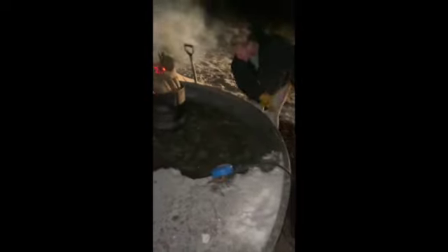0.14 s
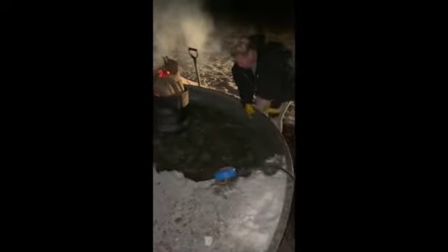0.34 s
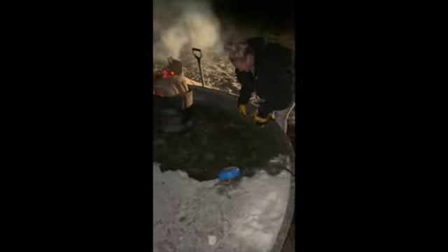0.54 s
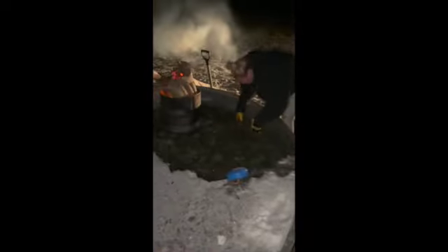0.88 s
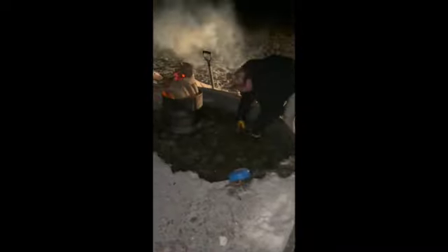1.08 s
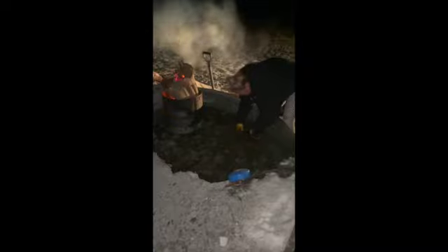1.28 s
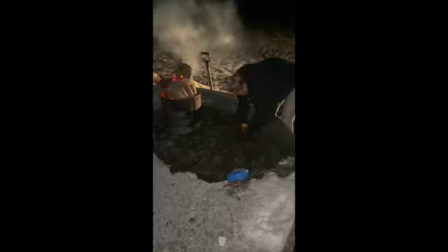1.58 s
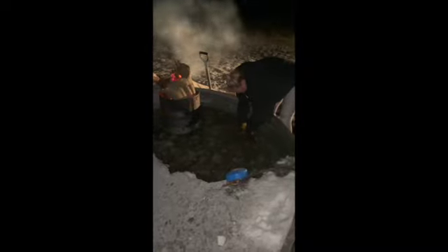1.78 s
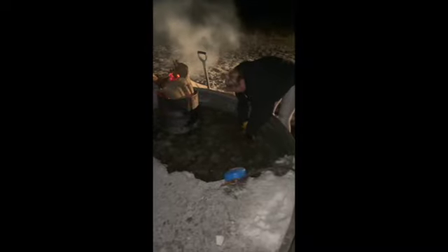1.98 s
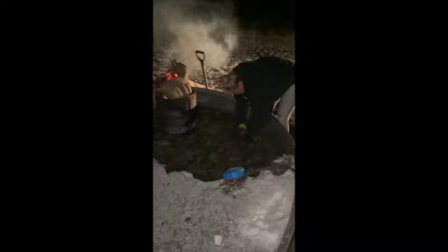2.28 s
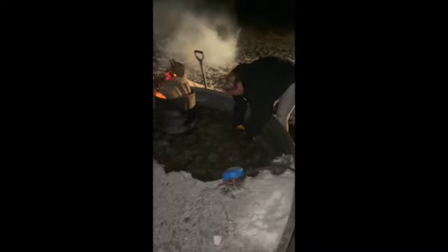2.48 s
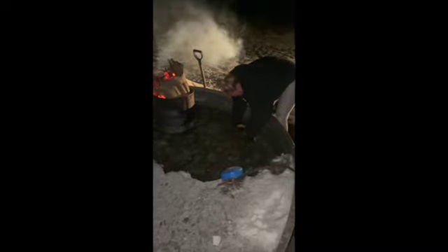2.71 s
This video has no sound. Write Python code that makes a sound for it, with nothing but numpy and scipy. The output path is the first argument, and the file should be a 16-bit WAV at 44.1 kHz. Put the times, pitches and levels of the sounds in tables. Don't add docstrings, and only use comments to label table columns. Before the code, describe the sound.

Ice being broken and moved in an outdoor water tank. Faint shard ticks and tiny glove squeaks near 0.2 s; at 0.3-0.58 s a fast brittle run of snaps, with a loud knock on the rim at 0.35 and crunching crumbs. Sparse ticks until 1.2, then hollow slabs bump and grind, busiest around 1.4-1.6, with sharp clacks near 1.95. Water laps and thumps, droplets chirp, low fire rumble throughout.

```python
import sys
import numpy as np
from scipy import signal
from scipy.fft import rfft, irfft, next_fast_len
from scipy.io import wavfile
from scipy.ndimage import uniform_filter1d

SR = 44100
rng = np.random.default_rng(int(sys.argv[2]) if len(sys.argv) > 2 else 0)


def persist_wave(psi):
    counts = np.round(np.clip(psi, -1, 1) * 32767).astype(np.int16)
    wavfile.write(sys.argv[1], SR, np.atleast_2d(counts).T)


def undo_db(level):
    steps = np.asarray(level, float) / 20
    return 10 ** steps


N = 125685

# t/s, peak level/dB, ring f/Hz, brightness/dB, length/ms
SNAPS = [(0.2952, -11, 1220, -5, 5.5), (0.3134, -14, 6900, 4, 1.4), (0.3002, -23, 3100, -13, 5.4),
         (0.3284, -13.5, 2520, -6.5, 8.2), (0.3334, -11.5, 5820, -11, 2.7), (0.368, -20.5, 2460, -7, 4.5),
         (0.3758, -35, 920, 11, 3.2), (0.3907, -13.5, 7100, 15, 1.2), (0.4044, -12.5, 1700, -5.5, 4.2),
         (0.4251, -16, 6650, 31, 1.7), (0.4482, -21.5, 2920, -13, 6.6), (0.4609, -23.5, 2730, -10, 5.9),
         (0.4808, -25.5, 6750, 6, 5.1), (0.5, -27, 1780, 2, 4.6), (0.5239, -14, 1010, -4, 2.8),
         (0.5763, -29.5, 1000, -18.5, 6.3)]
# t/s, peak level/dB, brightness/dB
TICKS = [(0.042, -45, 15), (0.063, -36, 20), (0.538, -54, 10), (0.572, -43, 10), (0.634, -34, -1),
         (0.653, -34, -9), (0.673, -33.5, -11), (0.742, -39, -2), (0.87, -34.5, -12), (0.8965, -38, 4),
         (0.93, -41.5, 1), (1.0918, -32.5, 13.5), (1.1097, -32, -24), (1.248, -32.5, -8), (1.3454, -34, 6),
         (1.369, -36, -1), (1.459, -37, 4), (1.4356, -26.5, -16.5), (1.474, -32.5, -22),
         (1.5032, -24.5, -18), (1.5258, -22, -14.5), (1.5544, -26, -11), (1.6739, -33.5, -16.5),
         (1.96, -40, 8), (1.998, -54, 4), (2.153, -41, 7), (2.2064, -48, 10), (2.2463, -42.5, 9),
         (2.319, -33.5, -15), (2.45, -33, -17.5), (2.7496, -35, 24)]
# t/s, peak level/dB, ring f/Hz
CHIPS = [(0.0295, -43.5, 3170), (0.854, -43.5, 2680), (1.151, -40, 2220), (1.2151, -36, 1260),
         (1.2357, -35.5, 1960), (1.3212, -40, 2610), (1.5926, -33, 2000), (1.8597, -40.5, 2230),
         (1.916, -39.5, 2980), (1.9994, -40, 1330), (2.0303, -32, 1420), (2.162, -39.5, 2790),
         (2.2802, -43, 1900), (2.377, -39, 1470), (2.5473, -37.5, 2440), (2.5794, -39, 3050),
         (2.6124, -40.5, 4020), (2.6472, -41.5, 3440), (2.6746, -40, 3320), (2.7033, -40.5, 2120),
         (2.8396, -38.5, 3010)]
# t/s, peak level/dB, ring f/Hz
CLACKS = [(0.2974, -25, 456), (0.844, -39, 614), (1.046, -32.5, 1470), (1.368, -28.5, 870),
          (1.435, -24, 990), (1.503, -40, 935), (1.735, -34, 2100), (1.804, -37.5, 606),
          (1.936, -20.5, 800), (1.9602, -16, 1270), (2.047, -30.5, 1080), (2.301, -32, 740),
          (2.419, -35, 1180), (2.475, -29, 860)]
# f/Hz, level/dB
CRACK_SPECTRUM = [(500, -2.5), (1200, 4.5), (3000, 8.5), (5000, 5), (6500, 10.5), (10000, 0), (13000, 8),
                  (16000, -8)]
# t/s, level/dB
CRUNCH_LEVEL = [(.29, -80), (.3, -48), (.36, -41), (.385, -56), (.41, -40.5), (.47, -45.5), (.52, -46.5),
                (.56, -57), (1.3, -70.5), (1.53, -49), (1.6, -56), (1.8, -80), (1.96, -69), (2.2, -58)]
# t/s, peak level/dB, share of the lower main mode/0-1
BUMPS = [(1.242, -32, 0.15), (1.373, -22.5, 0), (1.444, -19.5, 0.63), (1.469, -24.5, 0.93),
         (1.533, -26, 0.14), (1.512, -44, .2), (1.561, -17.5, 1), (1.59, -28, .3), (1.609, -30, 0.15),
         (1.815, -25, 0.3), (1.965, -35, 1), (2.051, -26, 0.58), (2.091, -35.5, 0.2), (2.31, -32, 0.34),
         (2.501, -23, 0.52), (2.526, -24, 0.4), (2.559, -29, 0.8), (2.716, -31, 0.32)]
# f/Hz, level/dB, t60/s
SLAB_MODES = [
    (216, -2.5, .05),
    (305.5, -2.5, 0.11),
    (342.9, 0, 0.094),
    (603, -9.5, 0.071),
    (780, -9, 0.046),
    (959, -7, 0.051),
    (1238, -10.5, 0.037),
    (1420, -26, 0.021),
]
# t/s, level/dB
STIR_LEVEL = [(0, -53.5), (.13, -52), (.26, -55.5), (.36, -48), (.6, -55), (.69, -48.5), (.78, -62.5),
              (1.0, -52.5), (1.3, -47.5), (1.53, -38), (1.68, -41), (1.78, -49), (1.97, -38.5),
              (2.08, -43.5), (2.2, -51.5), (2.5, -44), (2.68, -48.5), (2.85, -52)]
SQUEAK_TIMES = [
    .192,
    .222,
    .238,
    .256,
]
# f/Hz, level/dB
LAP_SPECTRUM = [(300, -9), (600, 7.5), (1000, -17.5), (2000, -11), (4000, -18.5), (8000, -23.5),
                (12000, -22), (16000, -22.5)]
# t/s, peak level/dB, f/Hz
THUMPS = [(0.013, -35.5, 155), (0.202, -30.5, 112), (0.339, -27, 107.3), (.48, -27.5, 59.3),
          (0.546, -20, 69), (0.574, -25, 85), (0.65, -28.5, 83), (1.072, -23, 103), (1.25, -26, 124),
          (1.605, -22.5, 146), (1.799, -30, 58), (1.919, -25, 79), (1.988, -25.5, 90), (2.522, -27, 150)]
# t/s, level/dB
SURGE_LEVEL = [(0, -45), (.22, -42), (.3, -40.5), (.56, -40), (.66, -42.5), (1.0, -40), (1.1, -41.5),
               (1.3, -40.5), (1.45, -41), (1.6, -38.5), (1.73, -39.5), (1.93, -38), (2.06, -37.5),
               (2.2, -42.5), (2.55, -39), (2.85, -42)]
# f/Hz, level/dB
RUMBLE_SPECTRUM = [(25, -79), (43, -3), (97, -4.5), (124, 1.5), (183, -7.5), (248, -8.5), (500, -35),
                   (1100, -120)]
# f/Hz, level/dB
AIR_SPECTRUM = [(400, -21), (750, -14), (1050, 13), (3000, -5), (6000, -1.5), (10000, 8.5), (13000, -6),
                (16000, -27)]
# f/Hz, correlation/1
LIKENESS = [(60, .999), (150, .98), (400, .88), (1000, .75), (4000, .8), (7000, .99), (9000, .999),
            (14000, .93)]
# f/Hz, phase/rad
PORT_PHASE = [(150, 0), (900, -.6), (2600, .7), (4300, .1), (7000, 1), (8550, 3.14), (11600, 3.14),
              (14000, 6.2)]
MATCHED_BAND_HZ = [8400, 11800]

SNAP_RING_DB, SNAP_RING_CYCLES, SNAP_PIVOT_HZ = -3, 16, 2600
TICK_MS, CHIP_MS, CLACK_MS, CLACK_DULL_HZ = 3.22, 4.6, 8.1, 1590
TOCK_S, TOCK_DB, TOCK_HZ, TOCK_RISE_MS, TOCK_T60_S = .3535, -4, 746, 4.55, 0.01
CRUNCH_PER_S, GRIND_PER_S, DROPS_PER_S = 4000, 700, 800
GRIND_DB, DROPS_DB, BUMP_RISE_MS = 5.5, -7, 6.1
SQUEAK_HZ, SQUEAK_T60_S = 1846, 0.021
LAP_DB, LAP_DULL_HZ, LAP_SWELL = -0.5, 850, 0.55
THUMP_CYCLES, THUMP_RISE_MS = 10, 19.4
RUMBLE_DB, AIR_DB = 1, -60
ECHO_DB, ECHO_T60_S, SCATTER_DB, GLINT_DB = -11, .075, -8, -6.5
PAN_DB, CUTOFF_HZ = -.4, 17000


def rms_one(x):
    return x / np.sqrt(np.mean(x ** 2) + 1e-20)


def in_time(rows):
    return np.interp(np.arange(N) / SR, *np.transpose(rows))


def at_hz(points, hz):
    f, value = np.array(points).T
    return np.interp(np.log(hz + 1), np.log(f), value)


def add(out, s, x):
    i = int(s * SR)
    out[i:i + len(x)] += x[:N - i]


def drift(rate_hz):
    r = np.exp(-80 * np.pi * rate_hz / SR)
    white = rng.standard_normal(N // 40 + 2002)
    slow = signal.lfilter([1], [1, -2 * r, r * r], white)[2000:]
    return np.interp(np.arange(N) / 40, np.arange(len(slow)), rms_one(slow))


def grains(per_s, spread_db):
    sizes = undo_db(spread_db * np.minimum(rng.exponential(1, N), 5)) * rng.choice([-1, 1], N)
    return sizes * (rng.random(N) < per_s / SR)


def ring(clicks, hz, t60_s):
    r = undo_db(-60 / (t60_s * SR))
    w = 2 * np.pi * hz / SR
    return signal.lfilter([0, np.sin(w)], [1, -2 * r * np.cos(w), r * r], clicks + 1e-18)


def push(clicks, hz, rise_ms):
    t = np.arange(900) / SR
    shape = np.sin(np.pi * np.minimum(t * 1000 / rise_ms, 1)) ** 2
    pulse = 2 * shape * np.cos(2 * np.pi * hz * t) / shape.sum()
    return signal.fftconvolve(clicks, pulse)[:N]


def colour(x, spectrum):
    cep = irfft(at_hz(spectrum, np.linspace(0, SR / 2, 1025)) * np.log(10) / 20)
    cep[1:1024] *= 2
    cep[1025:] = 0
    return signal.fftconvolve(x, irfft(np.exp(rfft(cep))))[:len(x)]


def banded_noise(spectrum, low_hz, count, patchy_db, rate_hz):
    out, together = 0, drift(rate_hz)
    edges = low_hz * 2 ** (np.arange(count + 1) / 2)
    white = rng.standard_normal((2, 2, N))
    for k, (low, high) in enumerate(zip(edges, np.minimum(edges[1:], 20000))):
        band = signal.butter(2, [low, high], "band", fs=SR, output="sos")
        mid, side = signal.sosfilt(band, white[k % 2])
        hz = np.sqrt(low * high)
        alike = np.clip(at_hz(LIKENESS, hz), -1, 1)
        gain = undo_db(at_hz(spectrum, hz) + patchy_db * (.6 * together + drift(rate_hz)))
        out = out + gain * (np.sqrt(1 + alike) * mid + np.sqrt(1 - alike) * side * [[1], [-1]])
    return rms_one(out)


def fracture(peak_db, hz, bright_db, ms, ring_db):
    t_ms = np.arange(2000) / SR * 1000
    noise, chips = rng.standard_normal((2, len(t_ms))), rng.random(4)
    ragged = np.exp(3.5 * uniform_filter1d(noise[1], size=40))
    burst = noise[0] * ragged * np.exp(-t_ms / (.45 * ms)) * np.minimum(t_ms / (.35 * ms), 1)
    chip_rings = sum(ring(burst, 900 * 14 ** c, .005) for c in chips)
    body = rms_one(burst) + .4 * rms_one(chip_rings)
    low = signal.lfilter(*signal.butter(2, SNAP_PIVOT_HZ * 1.3, "low", fs=SR), body)
    high = signal.lfilter(*signal.butter(2, SNAP_PIVOT_HZ * 1.6, "high", fs=SR), body)
    shard = ring(burst, hz, SNAP_RING_CYCLES / hz)
    x = rms_one(low) + undo_db(bright_db + 12.5) * rms_one(high) + undo_db(ring_db) * rms_one(shard)
    return undo_db(peak_db) * x / np.sqrt(uniform_filter1d(x ** 2, size=40).max())


def shards():
    out, dull = np.zeros((2, N))
    for s, db, hz, bright_db, ms in SNAPS:
        add(out, s, fracture(db - 9.5, hz, bright_db, ms, SNAP_RING_DB))
    for s, db, bright_db in TICKS:
        add(out, s, fracture(db - 6.5, 3350, bright_db, TICK_MS, ring_db=-14.5))
    for s, db, hz in CHIPS:
        add(out, s, fracture(db - 9, hz, -18.5, CHIP_MS, ring_db=3.5))
    for s, db, hz in CLACKS:
        add(dull, s, fracture(db - 2, hz, -13, CLACK_MS, ring_db=-5.0))
    add(out, TOCK_S, fracture(TOCK_DB - 13, 950, -9, TICK_MS, SNAP_RING_DB))
    clacks = signal.lfilter(*signal.butter(1, CLACK_DULL_HZ, fs=SR), dull)
    return colour(out + clacks, CRACK_SPECTRUM)


def tock():
    click, out = np.zeros((2, N))
    click[int(TOCK_S * SR)] = undo_db(TOCK_DB)
    for ratio, db in ((1.004, 2.5), (1.274, -1.5), (0.323, -13.5), (0.42, -12)):
        hz = TOCK_HZ * ratio
        out -= undo_db(db) * ring(push(click, hz, TOCK_RISE_MS), hz, TOCK_T60_S / ratio)
    return out


def crunch():
    clicks = grains(CRUNCH_PER_S * undo_db(3 * drift(60)), spread_db=2.6)
    dealt = rng.integers(0, 16, N)
    rings = 0
    for k, hz in enumerate(np.geomspace(900, 15000, num=16)):
        rings = rings + ring(clicks * (dealt == k), hz, 5.2 / hz) * (hz / 2000) ** -.05
    return colour(undo_db(in_time(CRUNCH_LEVEL) - 6.5) * rms_one(rings), CRACK_SPECTRUM)


def slabs(stir_db):
    s, db, share = np.transpose(BUMPS)
    share = np.clip(share, 0, 1)
    luck_db = rng.normal(0, 3, (len(s), len(SLAB_MODES)))
    rub = grains(GRIND_PER_S * undo_db(3 * drift(38)), spread_db=2.5)
    bumps, grind = 0, 0
    for k, (hz, mode_db, t60_s) in enumerate(SLAB_MODES):
        if k == 1:
            part = share
        elif k == 2:
            part = 1 - share
        else:
            part = undo_db(luck_db[:, k] - 11.5)
        clicks = np.zeros(N)
        clicks[(s * SR).astype(int)] = undo_db(db + mode_db) * part
        bumps = bumps + ring(push(clicks, hz, BUMP_RISE_MS), hz, t60_s)
        contacts = push(rub * rng.standard_normal(N), hz, rise_ms=2.7)
        grind = grind + undo_db(mode_db) * ring(contacts, hz, t60_s)
    grind_db = GRIND_DB + stir_db + 0.88 * (stir_db - stir_db.max())
    return undo_db(1.5) * bumps + undo_db(grind_db) * rms_one(grind)


def squeak():
    clicks = np.zeros(N)
    for s in SQUEAK_TIMES:
        add(clicks, s, undo_db(-88) * np.sin(2 * np.pi * SQUEAK_HZ * np.arange(300) / SR))
    return ring(clicks, SQUEAK_HZ, SQUEAK_T60_S)


def drops(stir_db):
    born = np.flatnonzero(rng.random(N) < DROPS_PER_S * undo_db(4 * drift(20)) / SR)
    luck = rng.random((N, 4))[born]
    out, t = np.zeros(N), np.arange(900) / SR
    for i, (pitch, size, glide, length) in zip(born, luck):
        hz = 800 * 7 ** pitch
        life_s = (1.5 + 5 * length ** 2) / hz
        bent_t = t + (glide - .3) * .06 * t ** 2 / life_s
        wave = np.sin(2 * np.pi * hz * bent_t) * (t / life_s) ** .4 * np.exp(-t / life_s)
        add(out, i / SR, size ** 2.86 * (hz / 1000) ** -.3 * wave)
    return undo_db(DROPS_DB + stir_db) * rms_one(out)


def glint(x):
    spray = rng.standard_normal(60) * np.exp(-np.arange(60) / 20)
    scattered = np.convolve(x, spray / np.linalg.norm(spray))[:N]
    edge = signal.sosfilt(signal.butter(4, 7300, "high", fs=SR, output="sos"), scattered)
    return undo_db(GLINT_DB) * edge * [[1], [-1]]


def tank(x):
    t = np.arange(6000) / SR
    tail = rng.standard_normal((2, len(t))) * undo_db(-60 * t / ECHO_T60_S) * (t > .001)
    tail = tail / np.sqrt((tail ** 2).sum(1, keepdims=True))
    same, unlike = signal.fftconvolve(x[None], tail, axes=1)[:, :N]
    same = signal.sosfilt(signal.butter(2, 900, "high", fs=SR, output="sos"), same)
    unlike = signal.sosfilt(signal.butter(2, [400, 16000], "band", fs=SR, output="sos"), unlike)
    return undo_db(ECHO_DB) * same + undo_db(SCATTER_DB) * unlike * [[1], [-1]]


def lapping(stir_db):
    lap = undo_db(LAP_DB + stir_db) * banded_noise(LAP_SPECTRUM, 300, count=12, patchy_db=2.2, rate_hz=35)
    dull = signal.sosfiltfilt(signal.butter(2, LAP_DULL_HZ, fs=SR, output="sos"), lap)
    return lap + (undo_db(LAP_SWELL * (stir_db - stir_db.max())) - 1) * dull


def thumps():
    out = np.zeros(N)
    for s, db, hz in THUMPS:
        click = np.zeros(8000)
        click[0] = undo_db(db)
        add(out, s, ring(push(click, hz, THUMP_RISE_MS)[:len(click)], hz, THUMP_CYCLES / hz))
    return out


def rumble():
    fire = banded_noise(RUMBLE_SPECTRUM, 25, count=9, patchy_db=1.1, rate_hz=20)
    low = undo_db(RUMBLE_DB + in_time(SURGE_LEVEL)) * fire + thumps()
    return signal.sosfilt(signal.butter(3, [40, 400], "band", fs=SR, output="sos"), low)


def air():
    return undo_db(AIR_DB) * banded_noise(AIR_SPECTRUM, 350, count=12, patchy_db=1.5, rate_hz=9)


def match_band(x):
    stop = signal.cheby2(5, 30, MATCHED_BAND_HZ, "stop", fs=SR, output="sos")
    side = signal.sosfiltfilt(stop, x[0] - x[1])
    return (x[0] + x[1] + side * [[1], [-1]]) / 2


def scene():
    stir_db, clicks = in_time(STIR_LEVEL), shards()
    ice = clicks + crunch() + tock() + slabs(stir_db) + drops(stir_db) + squeak()
    top_cut = signal.cheby2(8, 30, 16000, fs=SR, output="sos")
    hiss = signal.sosfilt(top_cut, lapping(stir_db) + air())
    direct = ice * undo_db(PAN_DB * np.array([[1], [-1]]))
    return direct + match_band(tank(ice) + hiss) + glint(clicks) + rumble()


def low_pass(x):
    return signal.sosfilt(signal.butter(12, 16960, fs=SR, output="sos"), x)


def record(dry):
    size = next_fast_len(N + 2000)
    hz = np.arange(size // 2 + 1) * SR / size
    turn = np.exp(.5j * at_hz(PORT_PHASE, hz) * [[1], [-1]])
    x = irfft(rfft(dry, size) * turn, size)[:, :N]
    x = signal.sosfilt(signal.cheby2(12, 60, CUTOFF_HZ, fs=SR, output="sos"), x)
    return low_pass(x)


dry = scene()
out = record(dry)
persist_wave(out)
```